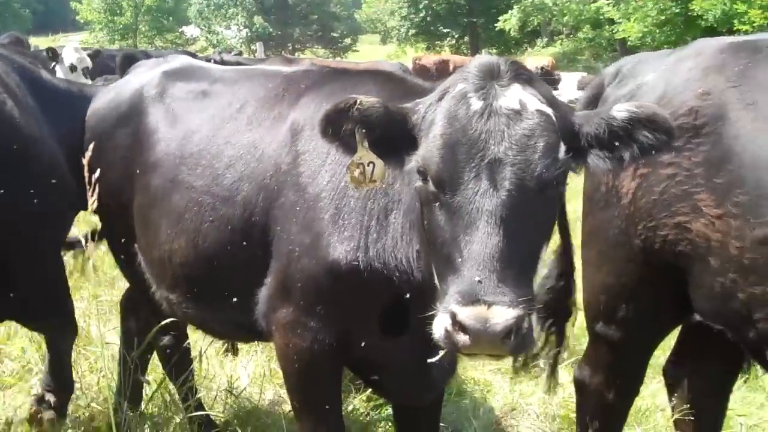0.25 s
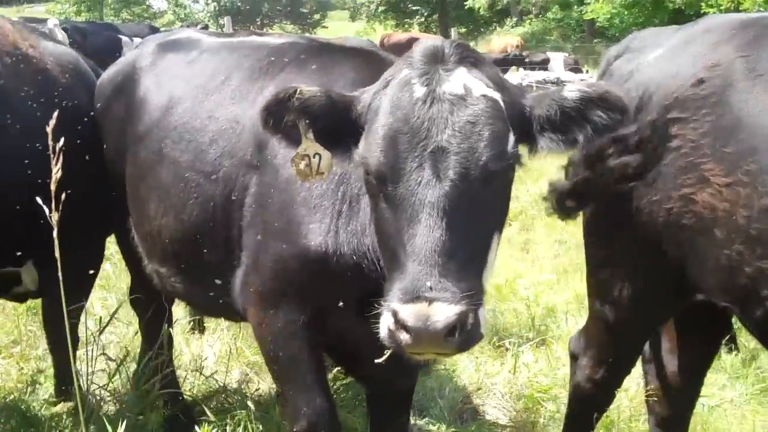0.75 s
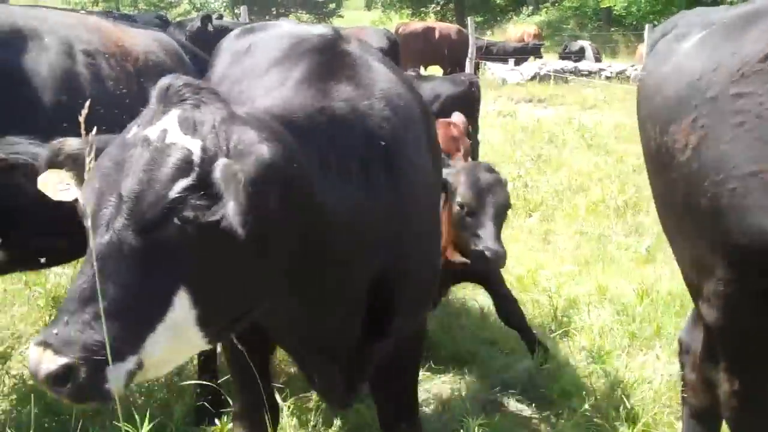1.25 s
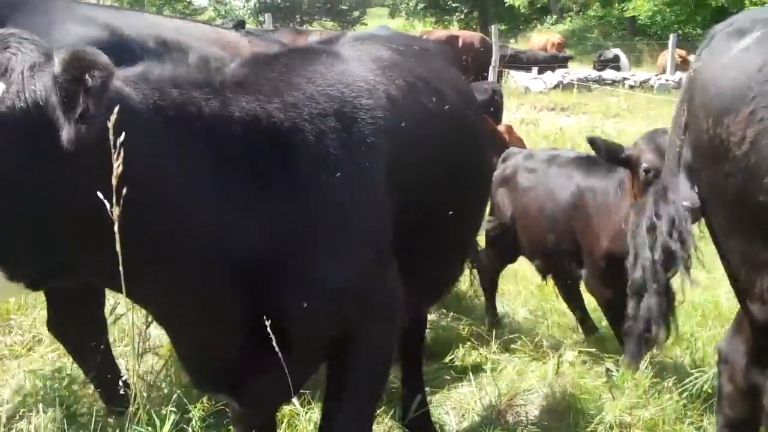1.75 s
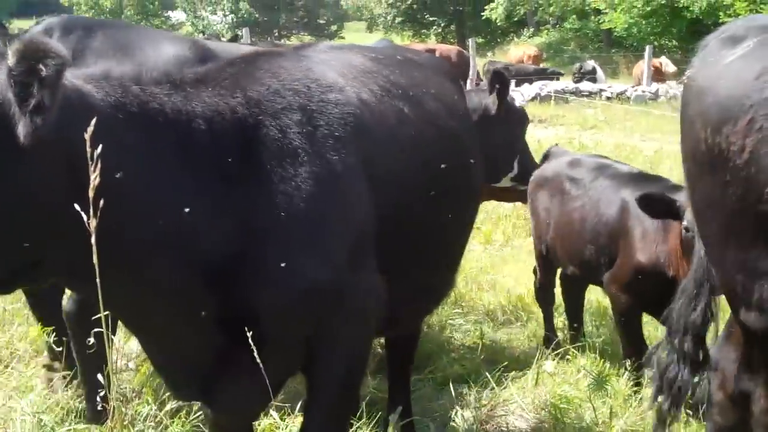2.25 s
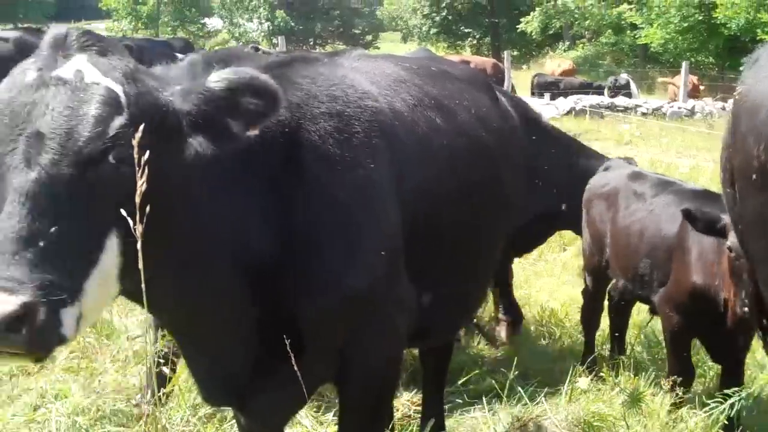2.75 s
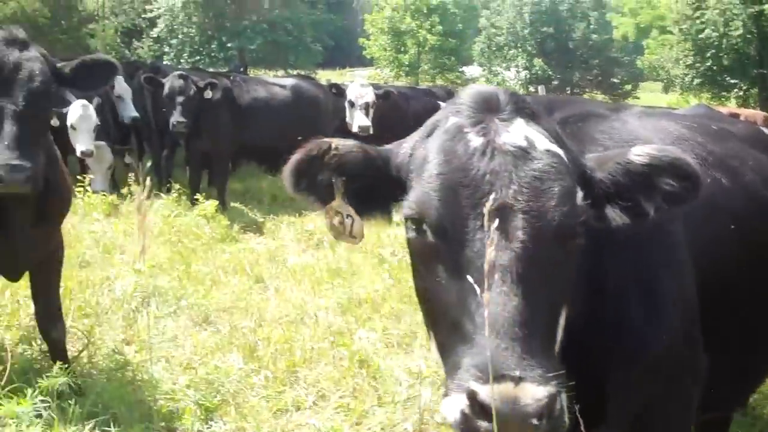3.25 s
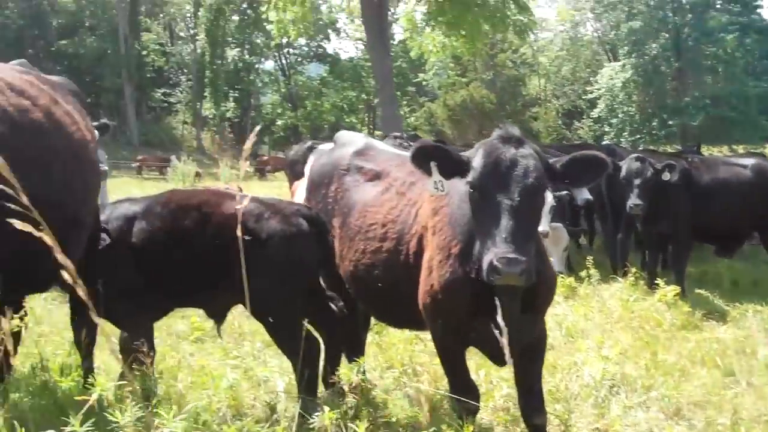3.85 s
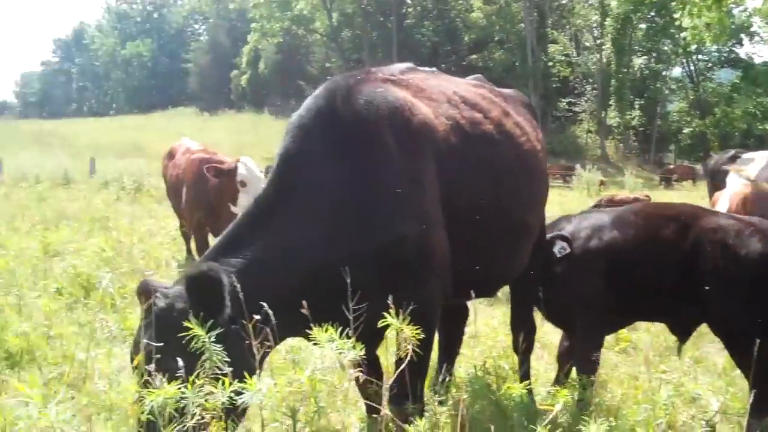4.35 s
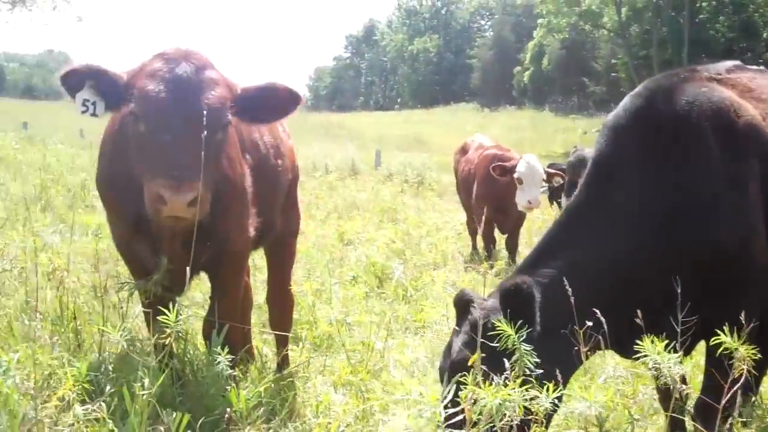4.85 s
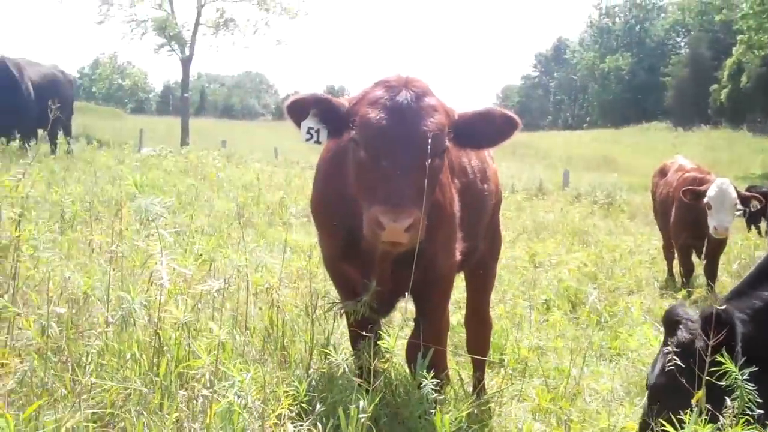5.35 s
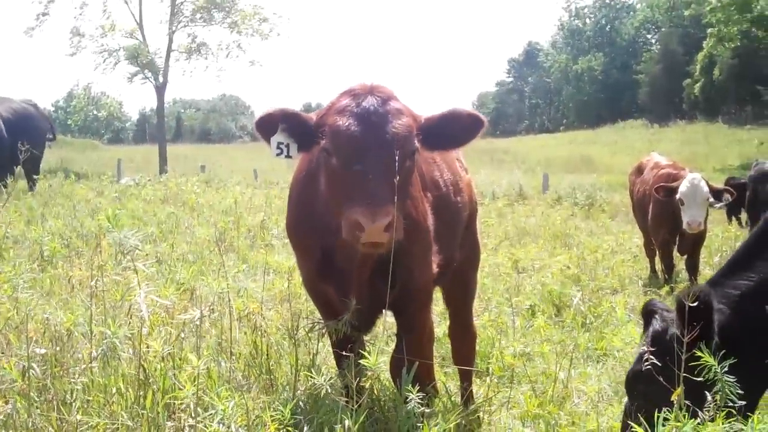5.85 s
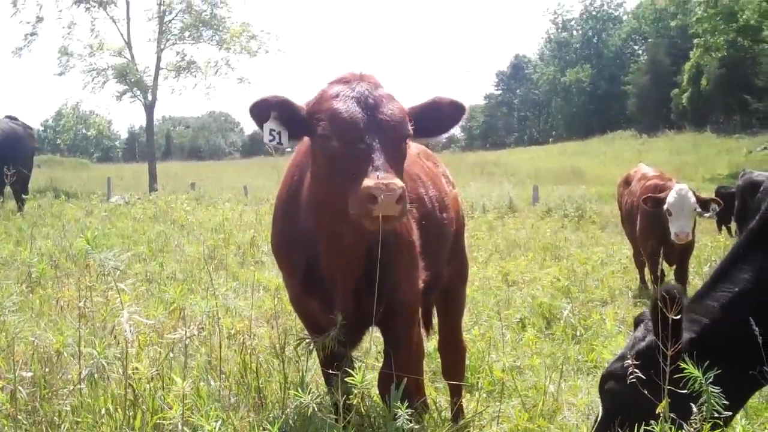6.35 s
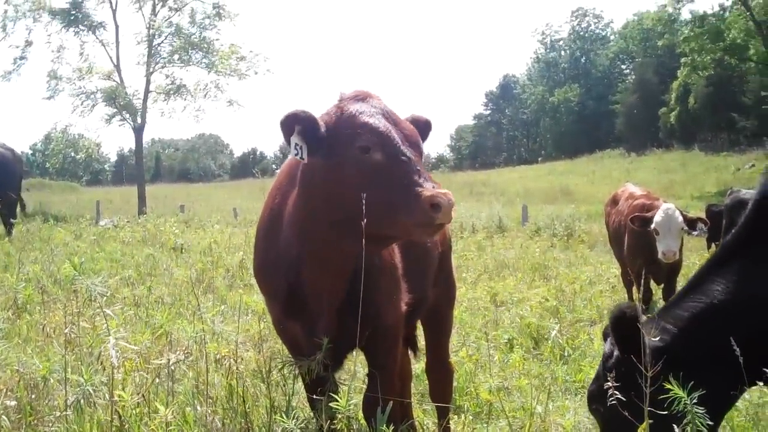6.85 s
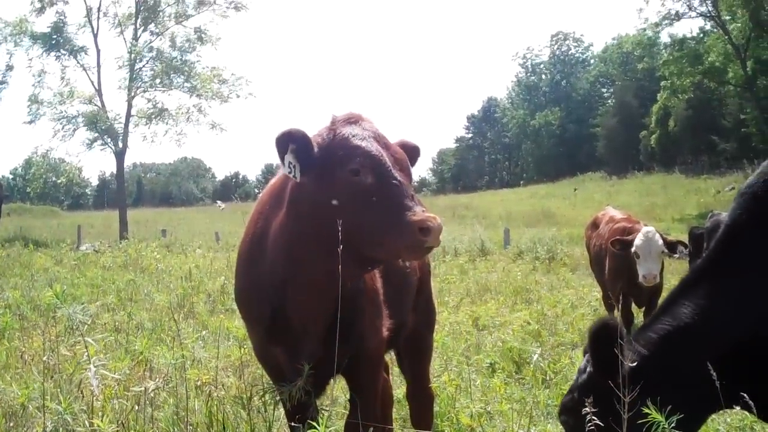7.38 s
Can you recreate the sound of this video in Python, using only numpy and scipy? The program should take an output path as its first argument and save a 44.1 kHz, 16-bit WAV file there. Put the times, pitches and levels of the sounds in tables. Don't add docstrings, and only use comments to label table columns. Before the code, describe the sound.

Cattle calling in an open field: four far moos that crack upward and drop, one bright close bellow, with rustling grass and snapping stalks.

```python
import sys
import numpy as np
from scipy import signal
from scipy.fft import rfft, irfft
from scipy.io import wavfile
from scipy.ndimage import uniform_filter1d

SR = 44100
rng = np.random.default_rng(int(sys.argv[2]) if len(sys.argv) > 2 else 0)


def to_linear_factor(level_db):
    exponent = np.asarray(level_db, float) / 20
    return 10 ** exponent


def wav_out(sig):
    wavfile.write(sys.argv[1], SR, np.round(np.clip(np.atleast_2d(sig).T, -1, 1) * 32767).astype(np.int16))


N = 335975

# (time [s], delay of the left microphone [samples])
CAMERA_TURN = [(0, -2), (1.8, -1), (3, 1), (3.8, 2.5), (4.6, 3), (7.62, 4.5)]


def evened(x):
    return x / np.sqrt(np.mean(x ** 2) + 1e-20)


def curve(points, t):
    return np.interp(t, *np.transpose(points))


def read(points, hz):
    f, value = np.transpose(points)
    return np.interp(np.log(hz + 1), np.log(f + 1), value)


def add(mix, s, sound):
    part = mix[..., round(s * SR):][..., :sound.shape[-1]]
    part += sound[..., :part.shape[-1]]


def coloured(x, shape):
    hz = abs(np.fft.fftfreq(8192, 1 / SR))
    log_gain = np.log(to_linear_factor(np.maximum(read(shape, hz), -90)))
    taps = np.fft.ifft(np.exp(np.conj(signal.hilbert(log_gain)))).real[:3000]
    return signal.oaconvolve(x, taps)[:len(x)]


def levelled(x):
    power = abs(uniform_filter1d(x ** 2, 1500, mode="reflect"))
    return x / np.sqrt(power + 1e-3 * np.mean(x ** 2))


def smooth_noise(shape, size):
    noise = rng.standard_normal(shape)
    return evened(uniform_filter1d(uniform_filter1d(noise, size), size))


def drift(count, size):
    return smooth_noise((count, size), 2500)


def resonate(x, hz, width):
    turn = np.exp(2j * np.pi * np.cumsum(hz) / SR)
    r = np.exp(-np.pi * width / SR)
    smooth = signal.lfilter([(1 - r) ** 2], [1, -2 * r, r ** 2], x / turn)
    return 2 * (turn * smooth).real


def microphones(x, lag, shade_db=1.0):
    hz = np.fft.rfftfreq(len(x), 1 / SR)
    left_db = -2.0 - shade_db * lag * np.clip(hz / 2500, 0, 1)
    half = to_linear_factor(left_db / 2) * np.exp(-1j * np.pi * hz * lag / SR)
    return np.array([irfft(rfft(x) * half, len(x)), irfft(rfft(x) / half, len(x))])


def ducking(t):
    start, end = 2.86, 3.43
    sunk = np.clip(2 * (t - start) / (end - start), 0, 1)
    return -13 * sunk * np.exp(-(np.maximum(t - end, 0) / 0.6) ** 2)


def wind():
    # (frequency [Hz], level [dB])
    rumble = [(15, -37), (30, -15), (45, 1), (70, -11.5), (110, 8), (200, -58)]
    # (time [s], level [dB])
    gusts = [(.005, -49), (.25, -54), (.51, -70), (1.06, -54), (1.6, -64), (1.909, -43.5), (2.36, -47.5),
             (4.01, -59), (4.39, -53), (4.69, -58), (4.961, -61), (5.62, -61), (6.02, -50.5), (6.6, -54),
             (7.15, -56), (7.4, -53), (7.567, -59)]
    t = np.arange(N) / SR
    strength = to_linear_factor(-66 + ducking(t))
    for s, db in gusts:
        strength += to_linear_factor(db) * np.exp(-abs(t - s) / 0.067)
    strength *= to_linear_factor(0.87 * ducking(t + .2))
    return microphones(evened(coloured(rng.standard_normal(N), rumble)) * strength, 0)


def grass_and_herd():
    # (frequency [Hz], level [dB per Hz])
    grass_shape = [(710, -44), (1200, -42), (1550, -34), (2180, 0), (2680, 0.5), (4040, 3), (8370, 0),
                   (9970, -1), (14000, -20.5)]
    herd_shape = [(60, -14.5), (120, 3.5), (200, -6), (350, -2), (550, -5.5), (750, -5), (920, -5.5),
                  (1200, -8), (2500, -14), (5000, -52)]
    # (frequency [Hz], likeness [0-1])
    likeness = [(50, 0.85), (300, 1), (1000, 0.87), (2500, 0.76), (6000, 0.19), (12000, 0.26)]
    # (time [s], level [dB])
    stir = [(0, -2), (.1, -5), (.3, 2), (.7, -2), (1.06, 3.5), (1.31, -1.4), (1.46, -5), (1.65, 0),
            (1.9, -2.5), (1.97, -0.5), (2.12, -2), (3.9, -0.5), (4.9, 1.5), (5.1, 1), (5.65, -2.5),
            (6.07, -2.5), (6.7, 1), (7.62, -0.7)]
    # (time [s], level [dB])
    swishes = [(.24, 1.5), (.6, 1.5), (.86, 0.5), (3.5, 6), (4.12, 1), (4.88, 1), (5.62, 4), (5.94, 1.5),
               (6.3, 2), (6.98, 4), (7.23, 4.5)]
    # (time [s], spread [s], level [dB])
    lowing = [(1.449, 0.097, 4.5), (1.8, 0.17, 6.5), (3.72, 0.28, 7.5), (7.0, 0.45, -4)]
    # (time [s], level [dB per 4 kHz above 6 kHz])
    sheen = [(0, 2), (.6, 1), (1.1, 2.5), (1.9, 2.5), (2.4, 0.5), (3.0, -0.5), (3.5, 3), (4.5, -6.5),
             (5.5, -0.5), (7.62, -3.5)]

    frames, hz = N // 128 + 5, np.fft.rfftfreq(512, 1 / SR)
    t = np.arange(frames) * 128 / SR
    a, b, c, d, patches = rng.standard_normal((frames, 257, 5)).T
    patches = evened(uniform_filter1d(uniform_filter1d(patches, 10, 0), 16, 1))
    flicker = np.minimum(rng.exponential(1, frames), 3) ** 2
    flicker = evened(uniform_filter1d(flicker, 4) - 1.5)

    stir_db = curve(stir, t)
    grass_db = -51 + stir_db - 5.5 * (t > 3.3) + ducking(t)
    grass_db += sum(db * np.exp(-((t - s) / 0.04) ** 2) for s, db in swishes)
    herd_db = -45.5 + stir_db + 0.58 * ducking(t)
    low_db = sum(db * np.exp(-((t - s) / spread) ** 2) for s, spread, db in lowing)

    grass = np.outer(evened(to_linear_factor(read(grass_shape, hz))), to_linear_factor(grass_db + 9.0 + 0.91 * flicker))
    herd = np.outer(evened(to_linear_factor(read(herd_shape, hz))), to_linear_factor(herd_db))
    herd *= to_linear_factor(np.outer((hz > 220) & (hz < 480), low_db))
    gain = np.hypot(grass, herd)
    gain *= to_linear_factor(np.outer(hz < 200, 0.48 * ducking(t + .3)))
    gain *= to_linear_factor(np.outer(np.clip(hz / 4000 - 1.5, 0, 2), curve(sheen, t)))

    lag = curve(CAMERA_TURN, t)
    same = np.clip(read(likeness, hz), 0, 1)[:, None]
    left = a + 1j * b
    right = same * left * np.exp(2j * np.pi * np.outer(hz, lag) / SR)
    right += np.sqrt(1 - same ** 2) * (c + 1j * d)
    half = to_linear_factor((-1.9 - 0.6 * np.outer(np.clip(hz / 4000, 0, 1), lag + 2)) / 2)
    spectra = np.array([left * half, right / half]) * gain * to_linear_factor(1.54 * patches)
    unit = signal.istft(left, nperseg=512, noverlap=384)[1].std()
    return signal.istft(spectra, nperseg=512, noverlap=384)[1][:, :N] / unit


def insects():
    band = signal.butter(2, [3930 - 50, 3930 + 50], "band", fs=SR, output="sos")
    fade_db = np.interp(np.arange(N) / SR, [0, 2.4, 3.2, 5], [0, 0, -14, 0])
    return to_linear_factor(-69.5 + fade_db) * evened(signal.sosfilt(band, rng.standard_normal((2, N))))


def far_cattle():
    band = evened(resonate(rng.standard_normal(N), np.full(N, 891.5), 44))
    swell_db = 3 * evened(uniform_filter1d(drift(1, N)[0], size=9000))
    return microphones(band * to_linear_factor(-63.5 + swell_db + 0.12 * ducking(np.arange(N) / SR)), 0)


def stalks_and_hooves():
    # (time [s], peak level [dB], centre frequency [Hz])
    snaps = [(0.2186, -27, 3740), (0.331, -21.5, 4100), (0.4976, -19, 6430), (0.582, -27, 4530),
             (1.1488, -21, 3260), (1.18, -11.5, 8050), (1.948, -26, 9410), (2.0651, -41, 3960),
             (3.482, -40, 4300), (3.504, -34, 4340), (4.101, -45, 3860), (4.8538, -30, 5200),
             (5.036, -29, 3620), (5.099, -23, 3400), (5.95, -28, 8350), (6.2, -28, 3480),
             (6.504, -28, 4410), (6.667, -29, 4500), (7.036, -24.5, 3760), (7.5134, -32, 3900)]
    # (time [s], peak level [dB], centre frequency [Hz])
    thuds = [(0.016, -36, 364), (1.15, -41, 980), (1.2, -37, 917), (1.875, -39, 200), (1.94, -46, 140),
             (2.171, -38.5, 1000), (3.491, -45, 132), (5.089, -37.5, 545)]
    bend_s = .012
    t = np.arange(2000) / SR
    u = t - bend_s
    band = signal.butter(2, [2500, 10000], "band", fs=SR, output="sos")
    sounds = []
    for s, db, hz in snaps:
        crack = np.sin(2 * np.pi * hz * u) * (u > 0) * np.exp(-abs(u) / 0.00034)
        crackle = .3 * signal.sosfilt(band, rng.standard_normal(2000)) * np.exp(-abs(u) / .006)
        sounds.append((s - bend_s, to_linear_factor(db) * (crack + crackle)))
    for s, db, hz in thuds:
        swell = t / 0.0073 * np.exp(1 - t / 0.0069)
        sounds.append((s, to_linear_factor(db) * np.sin(2 * np.pi * hz * t) * swell))
    out = np.zeros((2, N))
    for s, sound in sounds:
        add(out, s, microphones(sound, curve(CAMERA_TURN, s)))
    return out


def unrolled(rows):
    s, *columns = np.transpose(rows)
    t = np.arange(s[0], s[-1], 1 / SR)
    edge = np.clip(np.minimum(t - s[0], s[-1] - t) / 0.0078, 0, 1)
    return edge, [uniform_filter1d(np.interp(t, s, c), 300, mode="nearest") for c in columns]


def folds(hz, rough, top_hz=5000):
    wobble = smooth_noise(len(hz), 200)
    turns = np.cumsum(hz * (1 + .08 * rough * wobble)) / SR
    pulses = 0
    for k in range(1, int(top_hz / hz.min())):
        late = 3.0 * np.exp(-k * hz.mean() / 1300)
        pulses += np.cos(2 * np.pi * (k * turns - late)) * (k * hz < top_hz)
    puffs = (0.42 + np.exp(-(turns % 1) / 0.87)) * rng.standard_normal(len(hz))
    breath = rough * np.sqrt(SR / 2 / top_hz) * evened(puffs)
    return turns, -(1 - rough) * evened(pulses) + breath


def hummed(turns, nose, fall_db):
    partials = 0
    for k in range(1, 6):
        partials += to_linear_factor(-fall_db * max(k - 2, 0)) * np.cos(2 * np.pi * k * turns)
    return levelled(coloured(partials, nose))


def nose_and_lips(level_db, opening):
    out = np.clip(opening, 0, 1) ** 2
    return to_linear_factor(level_db) * np.sqrt(1 - out ** 2), to_linear_factor(level_db) * out


def throat_rings(airy, t, rough, jaw):
    # (frequency [Hz], later frequency [Hz], width [Hz], level [dB], later level [dB])
    cavities = [(2630, 2523, 213, 1.5, 0), (3080, 3040, 168, 6, -0.5), (3470, 3370, 190, -7.5, -7.5),
                (3860, 3940, 135, 0.5, -2), (4300, 4450, 230, -6, -10), (5250, 5200, 480, -9.5, -16),
                (6060, 6440, 600, -12, -11), (6900, 6700, 230, -18, -14.5), (8000, 7800, 2100, -33, -28),
                (5550, 5780, 2550, -10.5, -17)]
    dull_db = np.interp(t, (3.0, 3.12), [0, -6])
    settled = np.interp(t, (2.69, 2.79), [0, 1])
    flutter = smooth_noise((len(cavities), len(t)), 700)
    slide, swell = drift(2 * len(cavities), len(t)).reshape(2, -1, len(t))
    rings = 0
    for k, (hz, late_hz, width, db, late_db) in enumerate(cavities):
        ring_db = db + (late_db - db) * settled + dull_db * (3600 < hz < 5500)
        ring_db += 2.0 * swell[k] + 28 * rough * flutter[k]
        ring_db += 31 * rough * (hz > 4200)
        moving_hz = (hz + (late_hz - hz) * settled) * jaw * (1 + .01 * slide[k])
        rings += (-1) ** k * to_linear_factor(ring_db) * resonate(airy, moving_hz, width)
    return rings


def near_cow():
    # (time [s], pitch [Hz], level [dB], mouth opening [0-1])
    bellow = [(2.18, 103, -45, 0.94), (2.33, 114.4, -32.5, 0.8), (2.471, 129.2, -25, 0.81),
              (2.63, 145.3, -17, 0.97), (2.809, 162.3, -17.5, 0.96), (2.878, 166, -17, 0.99),
              (3.008, 165.3, -18.5, 1), (3.109, 148.1, -24, 0.98), (3.209, 105, -38, 0.88)]
    # (frequency [Hz], level [dB])
    near_nose = [(60, -38), (110, -10.5), (165, -21), (300, -3), (480, 3.5), (620, -1), (900, -41)]
    near_mouth = [(400, -29), (640, 1), (830, 0.5), (1000, 7), (1320, -15), (1490, 7.5), (1650, -3),
                  (1820, 3), (1990, 12), (2260, -21.5), (2800, -75)]
    # (time [s], factor on the throat rings)
    jaw_moves = [(2.18, .92), (2.4, .92), (2.5, 0.93), (2.62, .99), (2.78, 0.99), (2.86, 1.0), (3.05, 1.0),
                 (3.24, 1.02)]
    # (time [s], roughness [0-1])
    roughness = [(2.18, .04), (2.46, .05), (2.48, .13), (2.7, .1), (2.85, .015), (3.02, .02), (3.24, .15)]
    # (time [s], level [dB])
    mouth_opens = [(2.46, -8), (2.472, -1.3), (2.55, -0.3)]
    # (time [s], level [dB])
    ring_effort = [(2.18, -5), (2.44, 2.5), (2.5, 1.5), (2.6, -2), (2.72, -4.5), (2.849, -6), (3.0, -6.5),
                   (3.1, -4), (3.2, 0.5)]
    # (time [s], frequency [Hz], level [dB])
    early_whistle = [(2.18, 3230, -54), (2.31, 3160, -45.5), (2.4, 2826, -33.5), (2.46, 2590, -39),
                     (2.52, 2680, -37), (2.56, 2640, -68)]

    edge, (hz, level_db, opening) = unrolled(bellow)
    start = bellow[0][0]
    t = start + np.arange(len(hz)) / SR
    rough = curve(roughness, t)
    nose, lips = nose_and_lips(level_db + curve(mouth_opens, t), opening)
    turns, drive = folds(hz, rough, 10500)
    airy = drive + .2 * rng.standard_normal(len(hz))

    rings = throat_rings(airy, t, rough, curve(jaw_moves, t))
    treble = to_linear_factor(curve(ring_effort, t) + 1.0) * lips * levelled(rings)
    voice = nose * hummed(turns, near_nose, 5.8)
    voice += to_linear_factor(2.0) * lips * levelled(coloured(drive, near_mouth))
    s, whistle_hz, whistle_db = np.transpose(early_whistle)
    whistle = levelled(resonate(airy, np.interp(t, s, whistle_hz), 74))
    voice += to_linear_factor(np.interp(t, s, whistle_db)) * whistle

    out = np.zeros((2, N))
    add(out, start, microphones(edge * voice, -5.0, .42))
    add(out, start, microphones(edge * treble, -3.9, .42))
    return out


def rasp(s, spread, hz, width, db):
    t = np.arange(-2 * spread, 2 * spread, 1 / SR)
    band = evened(resonate(rng.standard_normal(len(t)), np.full(len(t), float(hz)), width))
    return s - 2 * spread, to_linear_factor(db) * np.exp(-(t / spread) ** 2) * band


def fall(start, length, top_hz, level_db):
    u = np.linspace(0, 1, num=6)
    hz = top_hz / 2 ** (14 * length * u)
    mouth = np.interp(u, [0, .5], (0.84, 0.47))
    return np.transpose([start + length * u, hz, level_db - 21.5 * u, mouth])


def chest(rows, mouth, rough):
    # (frequency [Hz], level [dB])
    far_nose = [(50, -20), (85, 5.5), (180, 5.5), (300, 10), (400, -15.5), (600, -48.5)]
    edge, (hz, level_db, opening) = unrolled(rows)
    turns, drive = folds(hz, rough)
    nose, lips = nose_and_lips(level_db, opening)
    return edge * (nose * hummed(turns, far_nose, 27) + lips * levelled(coloured(drive, mouth)))


def head(rows, break_s, spread_s, upper_db, half_db, high_half_db):
    # (frequency [Hz], level [dB])
    second_mouth = [(700, -50), (1000, -3), (1140, 0), (1300, -6), (1650, -50)]
    upper_mouth = [(1200, -60), (1500, -20), (1710, 0), (2280, -11), (2850, -18), (3400, -29), (5000, -60)]
    half_mouth = [(150, -45), (280, 9), (850, 8), (1400, 2.5), (2000, -6), (4000, -71)]
    edge, (hz, level_db, opening, bright_db) = unrolled(rows)
    t = rows[0][0] + np.arange(len(hz)) / SR
    near = np.exp(-((t - break_s) / spread_s) ** 2)
    turns, drive = folds(hz, .04 + .07 * near)

    upper_shape = [(f, db + upper_db * (f > 2000)) for f, db in upper_mouth]
    half_shape = [(f, db + high_half_db * (f > 1000)) for f, db in half_mouth]
    second_swell, upper_swell = to_linear_factor(1.5 * drift(2, len(hz)))
    second = second_swell * levelled(coloured(drive, second_mouth))
    upper = upper_swell * levelled(coloured(drive, upper_shape))
    tone = np.sqrt(2) * np.sin(2 * np.pi * turns) + opening ** 2 * second + to_linear_factor(bright_db) * upper
    halves = sum(np.cos(2 * np.pi * (k - .5) * turns) for k in range(1, 5))
    paired = to_linear_factor(half_db - 18.5 * (1 - near)) * levelled(coloured(halves, half_shape))
    return edge * to_linear_factor(level_db) * (tone + paired)


def far_cow():
    # (time [s], pitch [Hz], level [dB], mouth opening [0-1])
    rise_1 = [(.04, 88.4, -46.5, 0.7), (.29, 101.9, -44.5, 0.16), (.434, 148.4, -42, 0),
              (.482, 173.3, -41.5, 0.8), (.536, 194.5, -38, 0.81), (.616, 203.6, -42.5, 0.94),
              (.64, 230, -36, 0.8)]
    rise_2 = [(2.02, 107.7, -51, .3), (2.1, 128.6, -38, 0.38), (2.144, 162.5, -43.5, 0.42),
              (2.201, 191, -38.5, 0.9)]
    hold_2 = [(2.56, 260.6, -44, .3), (2.628, 233.7, -29.5, 0.32), (2.7, 196, -30, 0.95),
              (2.804, 219.4, -33, 0.88), (2.93, 216.3, -45, 0.67), (2.968, 169, -42, 0.78),
              (3.03, 121.4, -47, 0.91)]
    rise_3 = [(3.8, 111.6, -49, 0.95), (3.87, 140, -47.5, 0.5), (3.905, 140.3, -38, 0.73),
              (3.935, 155.6, -44.5, 1), (3.985, 160.3, -43, 0.97), (4.01, 214.6, -46, 0.98),
              (4.085, 234, -43.5, 1), (4.15, 254, -47, 0.99)]
    break_3 = [(4.38, 259, -37.5, 0.98), (4.471, 260.5, -31.5, 0.87), (4.5, 216, -26.5, 0.5)]
    hold_3 = [(4.49, 222.2, -26.5, 0.73), (4.52, 204.7, -33, 0.75), (4.657, 218.1, -27.5, 0.76),
              (4.793, 217.9, -27, 0.77), (4.94, 216.8, -28, 0.79), (4.975, 200, -32.5, 0.91),
              (5.016, 138, -27.5, 0.31), (5.06, 102.9, -63, 0.44)]
    rise_4 = [(6.12, 79.1, -51, 0.67), (6.296, 101, -45, 0.51), (6.436, 135.5, -31, 0.62),
              (6.534, 163.6, -32, 0.86), (6.616, 183.3, -33, 0.93), (6.714, 217.5, -31.5, 0.96),
              (6.728, 290.6, -33.5, 0.47), (6.756, 295, -34, 0.78), (6.79, 292, -45, .3)]
    # (time [s], pitch [Hz], level [dB], mouth opening [0-1], upper overtones [dB])
    head_tones = [
        [(.63, 449, -41, 0.7, -28), (.675, 546, -40.5, 0.5, -24), (.71, 568, -31, 0.5, -19),
         (.73, 563.6, -33.5, 0.28, -8), (.91, 562.2, -32, 0.54, -12), (.94, 551, -38.5, 0.75, -3),
         (.97, 552, -36.5, 0.72, -20), (1.074, 560.5, -38.5, 0.4, -11), (1.1, 568, -51, 0.52, -10)],
        [(2.2, 563, -54.5, 0.95, 6), (2.274, 582.3, -32, 0.78, -14.5), (2.38, 578, -31, 0.6, -11),
         (2.448, 567.6, -28, 0.6, -12.5), (2.535, 596, -27, 0.68, -4), (2.56, 560, -28.5, 0.9, -4),
         (2.6, 545, -40, 0.8, -8)],
        [(4.14, 560.6, -36, 0.4, -18), (4.165, 576.5, -36.5, 0.52, -3.5), (4.27, 572.5, -31, 0.87, -2),
         (4.31, 563.8, -35.5, 0.8, -4), (4.395, 561, -28, 0.85, -11.5), (4.422, 553, -38, 0.9, -9),
         (4.496, 568, -35.5, 0.77, -10), (4.568, 577.5, -35.5, 0.56, -9), (4.66, 572, -48, 0.64, 2)],
        [(6.72, 557, -42, 0.56, -25), (6.794, 568, -30.5, 0.45, -29), (6.918, 570, -26.5, 0.49, -25),
         (7.0, 570.3, -26.5, 0.36, -23), (7.046, 569, -25, 0.2, -25.5), (7.14, 570.5, -24.5, 0.15, -21),
         (7.19, 563, -24, 0.58, -18), (7.215, 509, -30.5, 0.97, -15)],
    ]
    # (time of break [s], spread of paired cycles [s], partials above the third [dB],
    # half-pitch lines [dB], the highest of them [dB])
    head_breaks = [(.91, 0.17, -12, -3, 1), (2.47, 0.083, 2.5, -11, 2), (4.4, 0.13, -2, -13.5, 1),
                   (7.172, 0.088, 6.5, -14.5, -22)]
    # (start [s], length [s], first pitch [Hz], level [dB])
    drops = [
        (0.975, 0.1, 255, -33.5),
        (7.196, 0.086, 314.5, -25.5),
    ]
    # (time [s], spread [s], centre frequency [Hz], width [Hz], level [dB])
    rasps = [(4.34, .06, 2290, 290, -48), (4.47, 0.04, 950, 480, -39.5), (7.03, .05, 2560, 420, -44.5),
             (7.025, .012, 2450, 240, -49), (6.745, 0.022, 856, 190, -40), (7.31, 0.063, 1150, 30, -49),
             (6.69, 0.0097, 1540, 360, -41), (0.87, .03, 990, 120, -41), (3.975, 0.018, 960, 45, -39.5),
             (.635, .015, 580, 230, -41), (1.92, .05, 380, 600, -42), (4.4, .04, 226, 58, -46),
             (6.62, .06, 2730, 630, -48.5), (.03, 0.01386, 293, 120, -37.5), (6.52, .04, 2200, 180, -44.5)]
    # (frequency [Hz], level [dB])
    rising_mouth = [(380, -8.5), (620, 14.5), (780, 7.5), (950, 14), (1090, -7), (1220, 8), (1550, -18),
                    (2000, 4), (2400, -14), (2800, -4), (3400, -48), (5000, -56)]
    first_mouth = [(380, 3), (640, 5), (800, 12.5), (1000, -3), (1200, 9), (1650, 1), (2000, 1),
                   (3000, -33)]
    third_mouth = [(300, -17), (480, -2), (640, 5.5), (790, -9), (960, 4), (1150, -10), (1550, -7),
                   (2400, -35)]
    held_mouth = [(250, -40), (436, -7), (655, 2), (875, 0), (1090, -11), (1310, -16), (1700, -20),
                  (2600, -25), (4000, -50)]

    tones = [(rise_1, first_mouth, .11), (rise_2, rising_mouth, .05), (hold_2, held_mouth, .03),
             (rise_3, third_mouth, .3), (break_3, held_mouth, .28), (hold_3, held_mouth, .03),
             (rise_4, rising_mouth, .05)]
    tones += [(fall(*row), held_mouth, .1) for row in drops]
    parts = [(rows[0][0], chest(rows, mouth, rough)) for rows, mouth, rough in tones]
    parts += [(rows[0][0], head(rows, *row)) for rows, row in zip(head_tones, head_breaks)]
    parts += [rasp(*row) for row in rasps]
    out = np.zeros((2, N))
    for s, sound in parts:
        add(out, s, microphones(sound, curve(CAMERA_TURN, s)))
    return out


def echoed(x, scatter_db, echo_db):
    # (delay [s], level [dB])
    tree_echoes = [(.195, -15), (.34, -30)]
    t = np.arange(SR // 2) / SR
    noise = rng.standard_normal((2, len(t))) + 1.3 * rng.standard_normal(len(t))
    tail = noise * to_linear_factor(-60 * t / 0.15) * (t > .004)
    tail *= to_linear_factor(scatter_db) / np.linalg.norm(tail[0])
    for delay, db in tree_echoes:
        tail[:, round(delay * SR)] += to_linear_factor(db + echo_db)
    tail = signal.lfilter(*signal.butter(1, [280, 6000], "band", fs=SR), tail)
    return x + signal.fftconvolve(x, tail, axes=1)[:, :N]


def scene():
    background = wind() + grass_and_herd() + insects() + far_cattle() + stalks_and_hooves()
    return background + echoed(near_cow(), -17, -20) + echoed(far_cow(), -13, 0)


def roll_off(x):
    return signal.sosfilt(signal.butter(12, 14780, fs=SR, output="sos"), x)


def record(dry):
    low_pass = signal.firwin(511, 14250, window=("kaiser", 9), fs=SR)
    limited = signal.oaconvolve(dry, low_pass[None], "same")
    return roll_off(limited)


dry = scene()
out = record(dry)
wav_out(out)
```